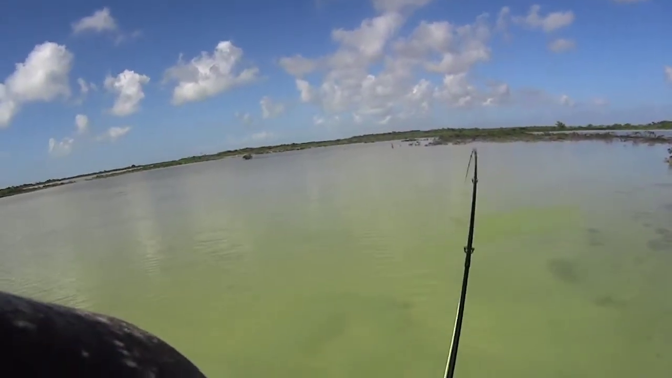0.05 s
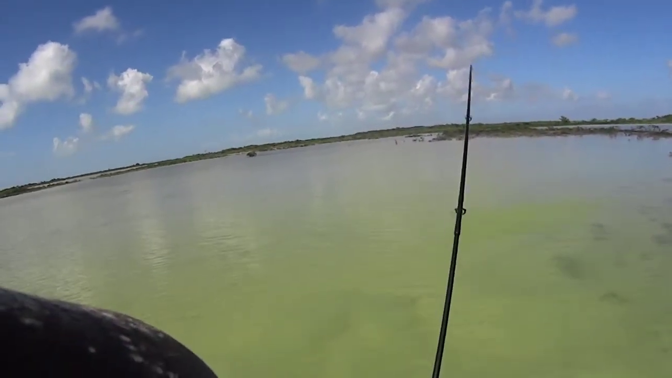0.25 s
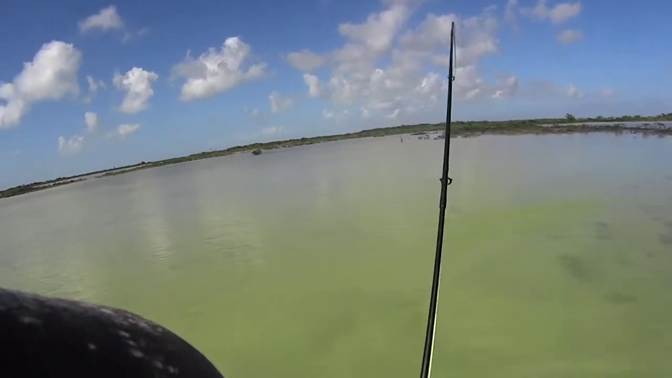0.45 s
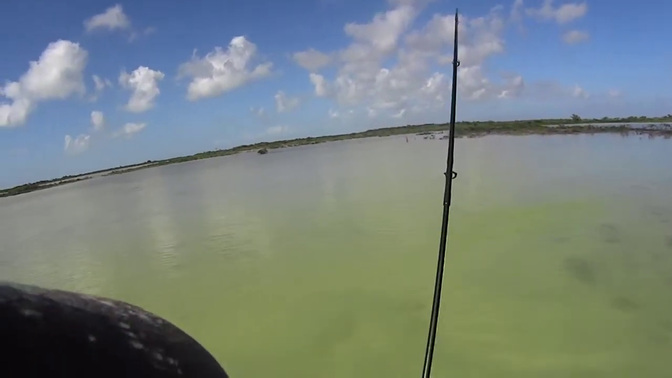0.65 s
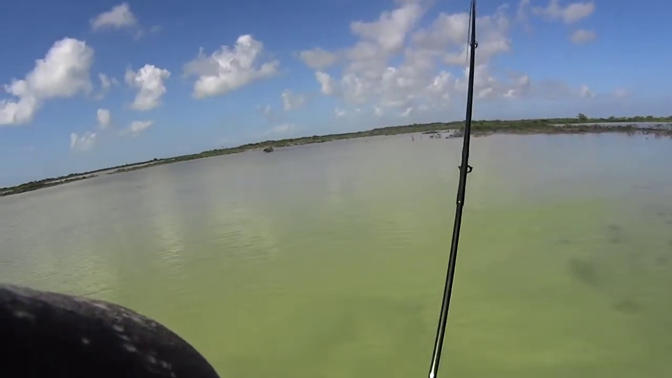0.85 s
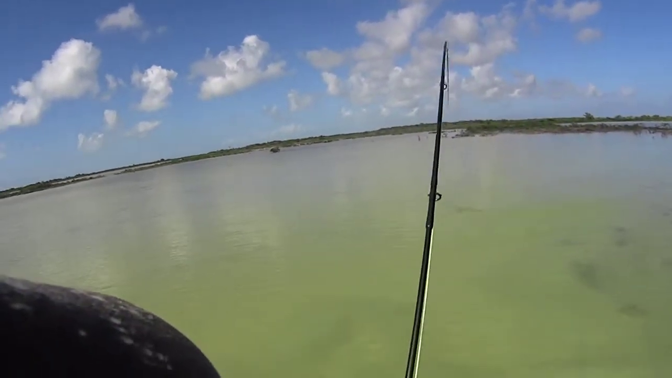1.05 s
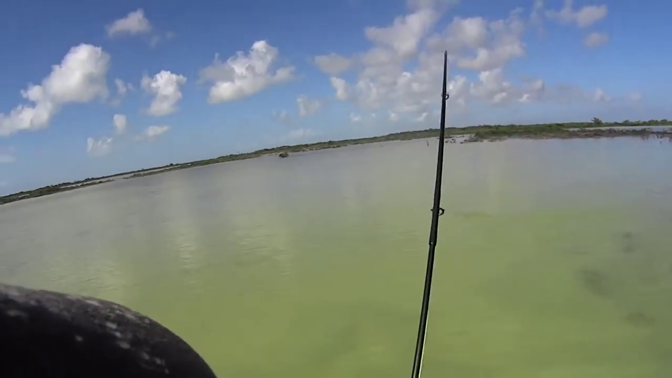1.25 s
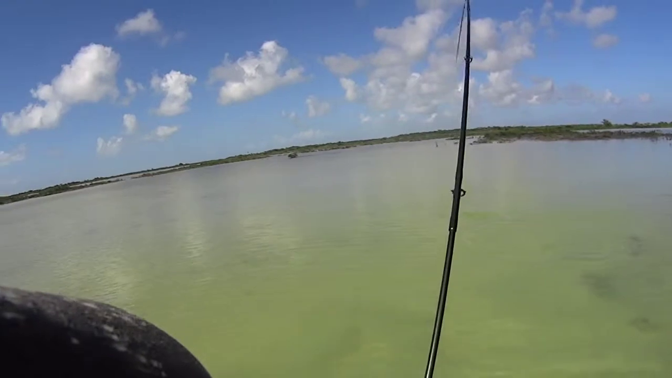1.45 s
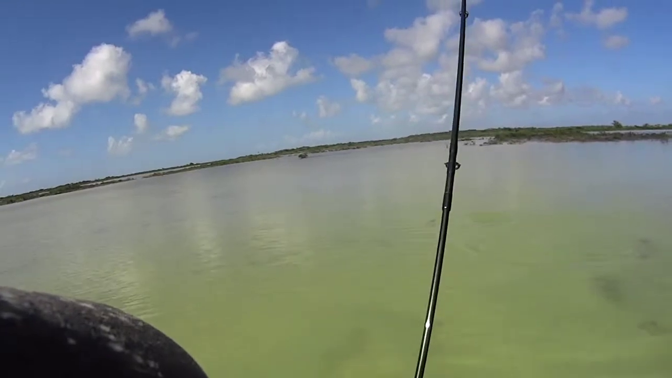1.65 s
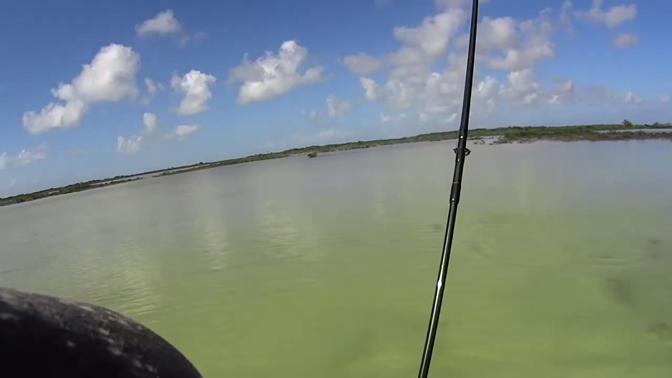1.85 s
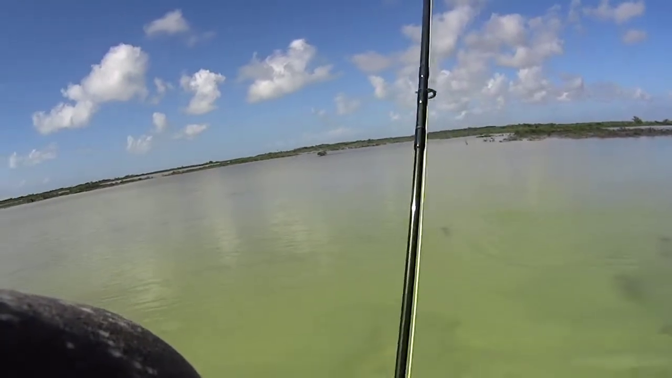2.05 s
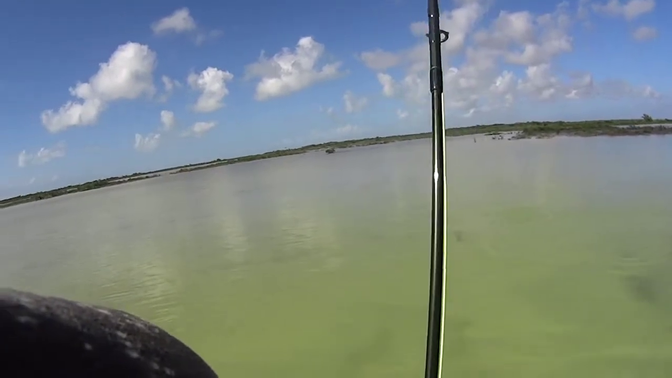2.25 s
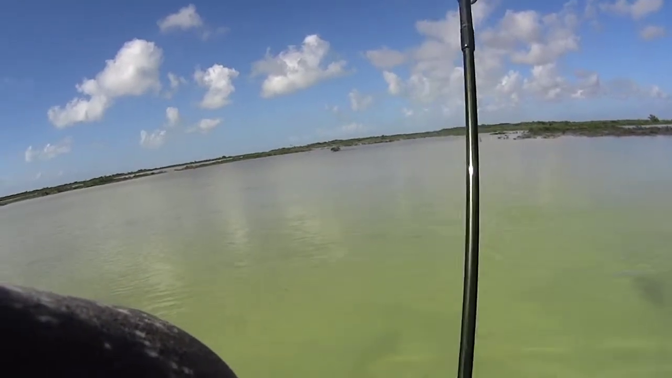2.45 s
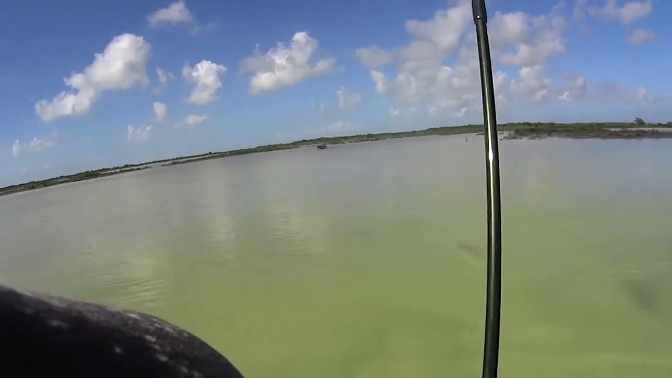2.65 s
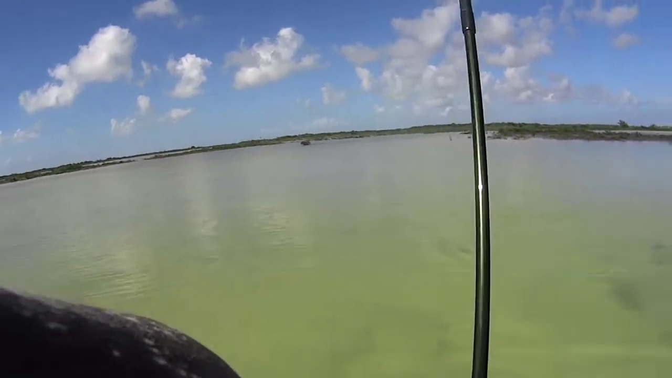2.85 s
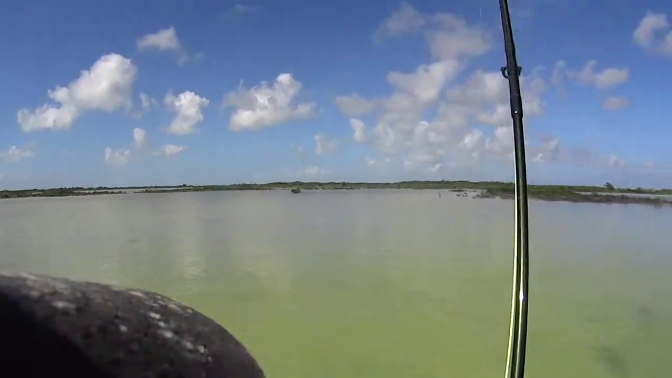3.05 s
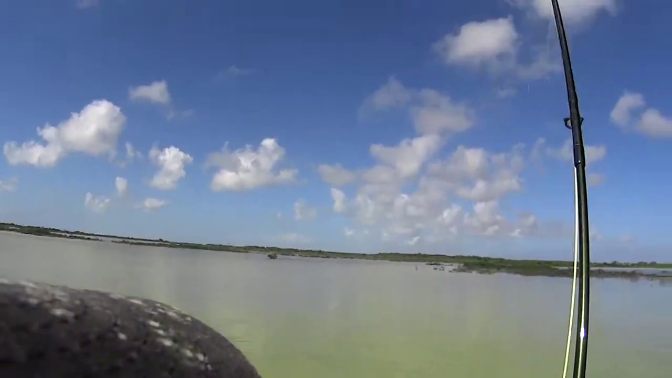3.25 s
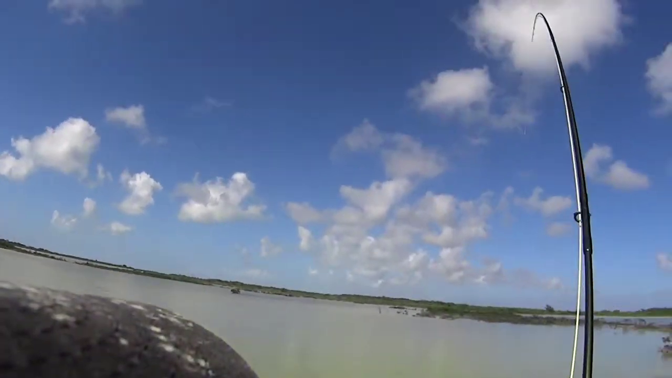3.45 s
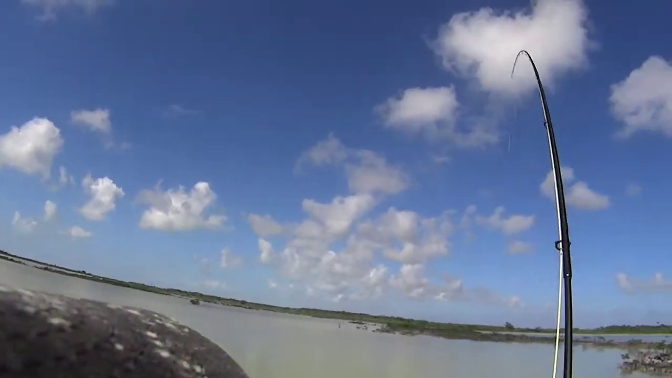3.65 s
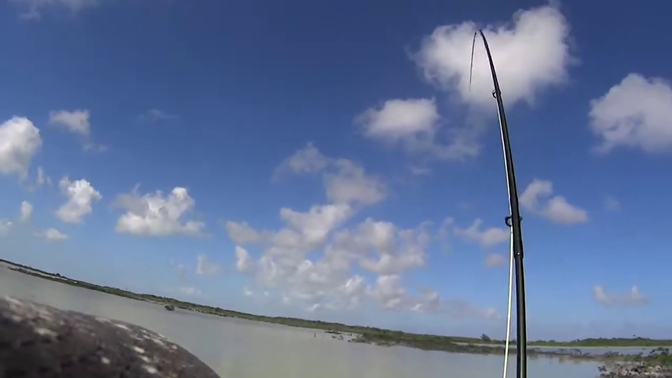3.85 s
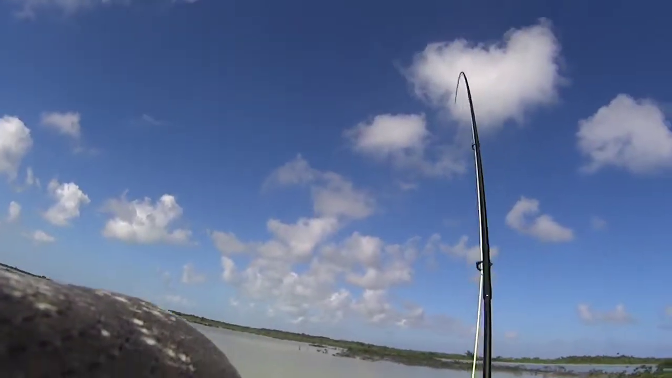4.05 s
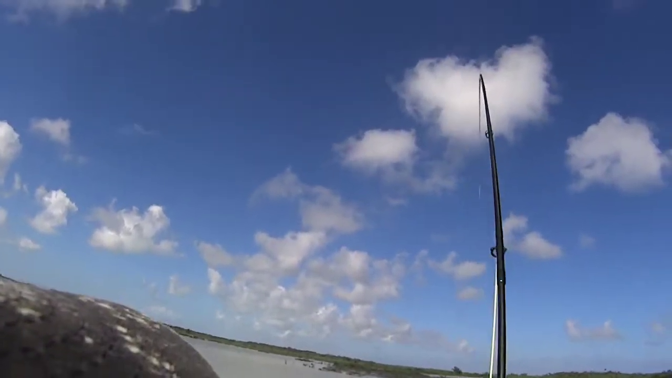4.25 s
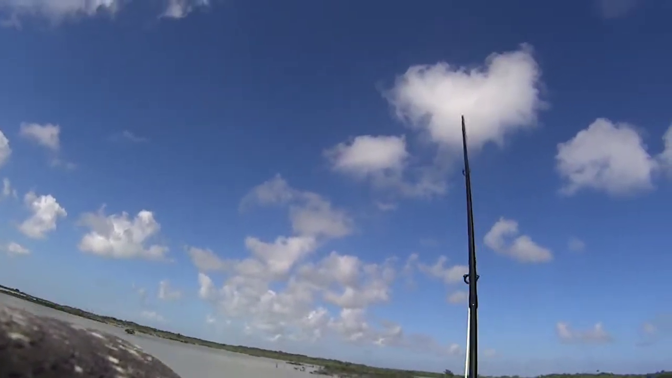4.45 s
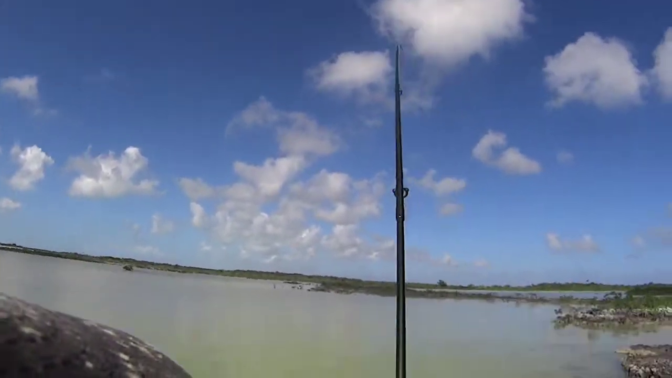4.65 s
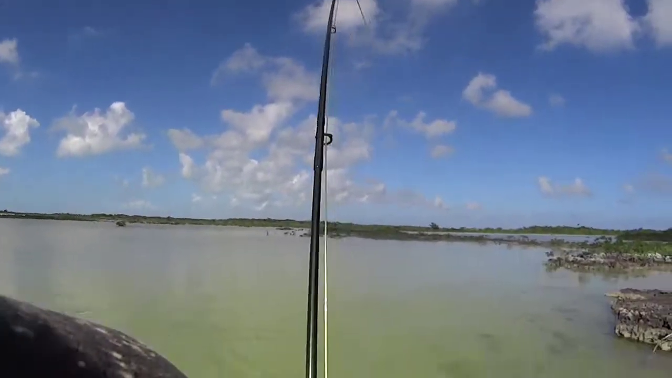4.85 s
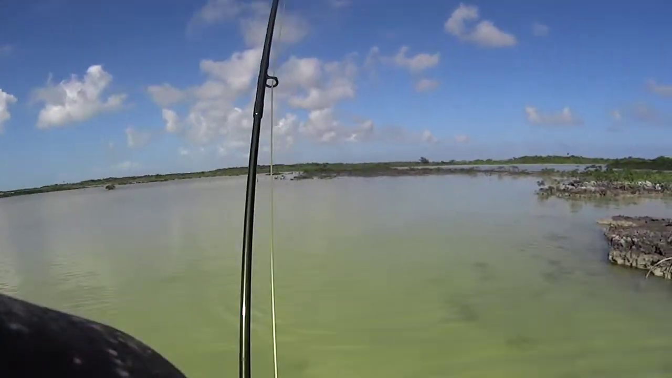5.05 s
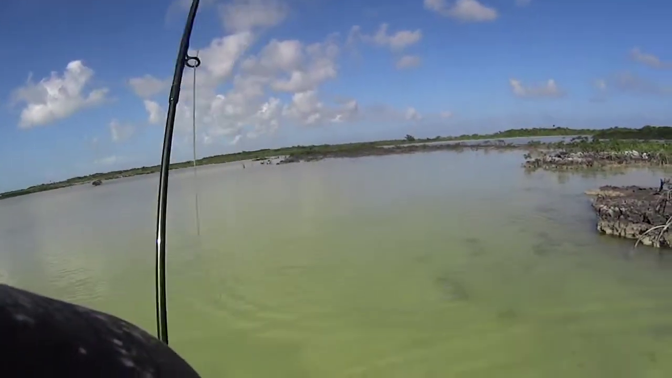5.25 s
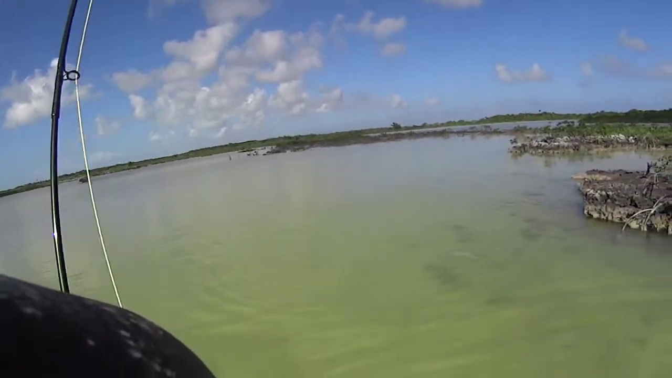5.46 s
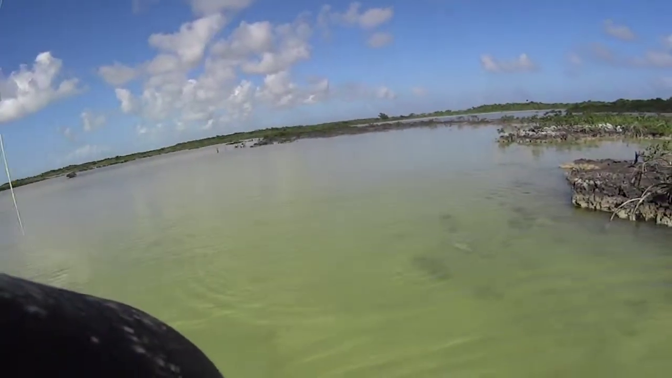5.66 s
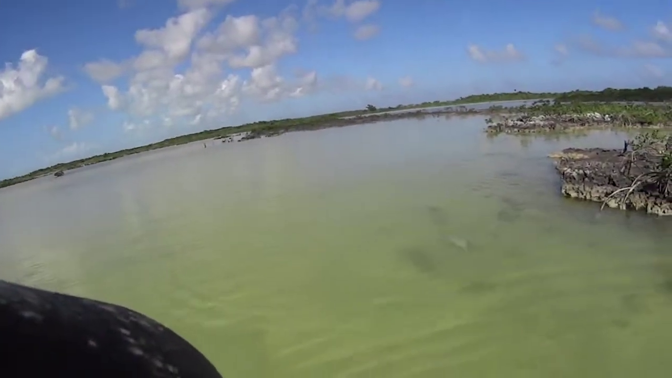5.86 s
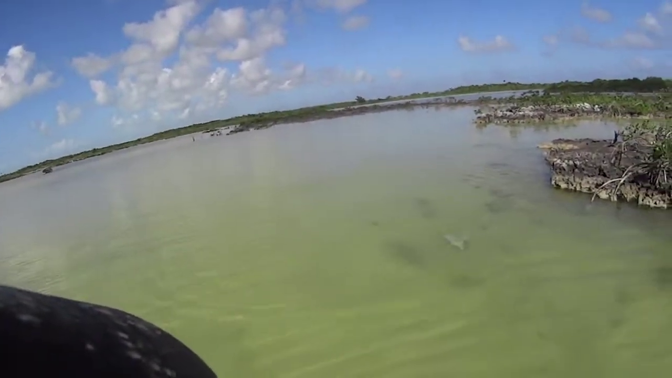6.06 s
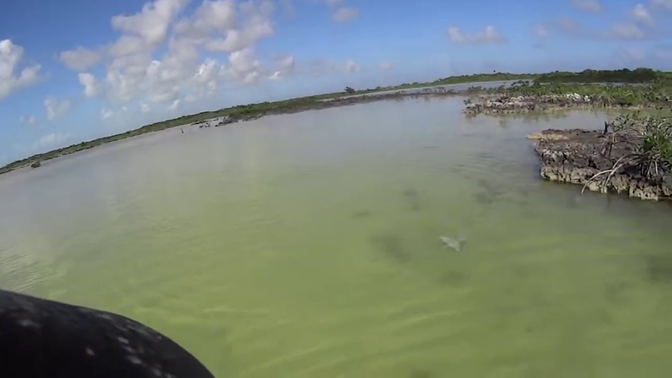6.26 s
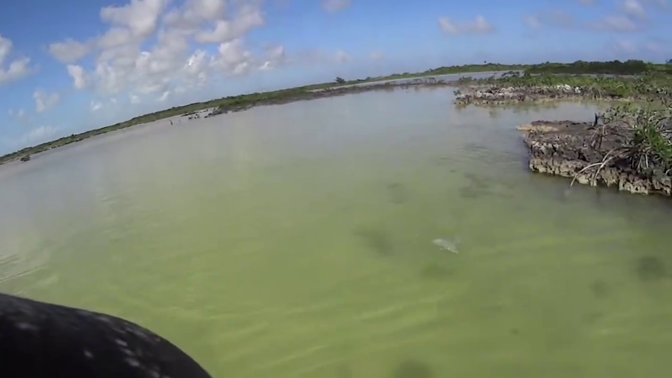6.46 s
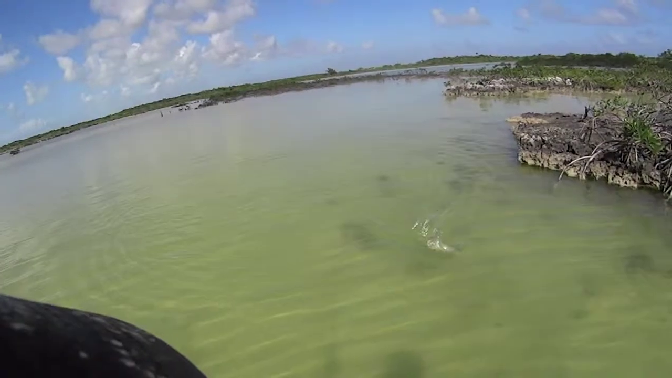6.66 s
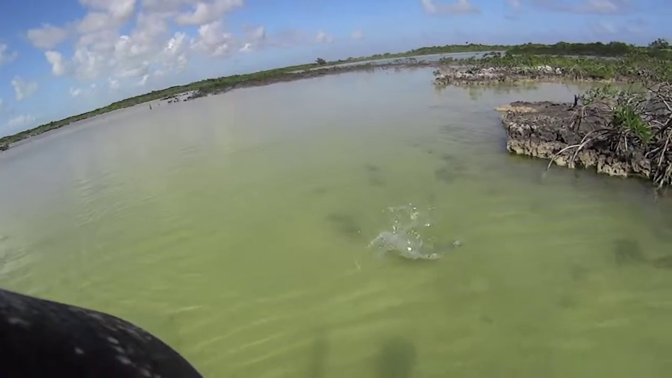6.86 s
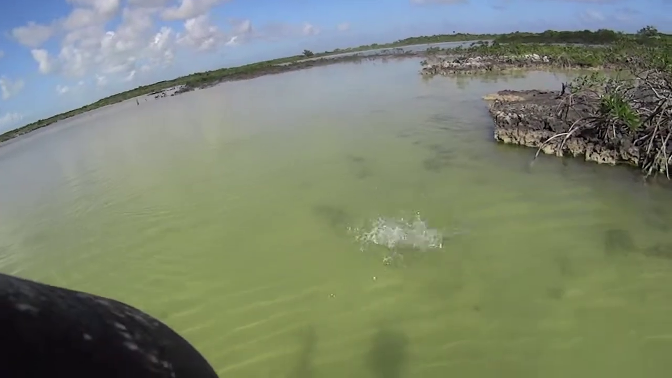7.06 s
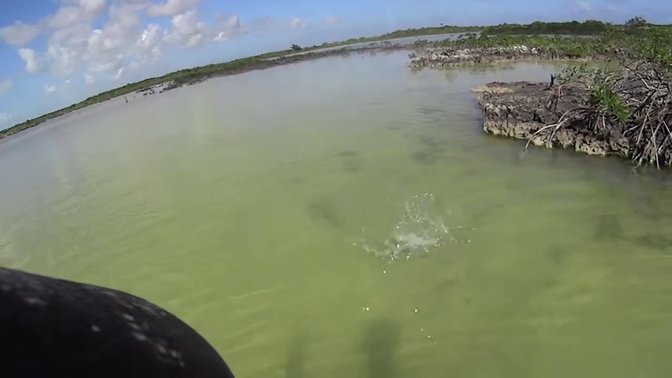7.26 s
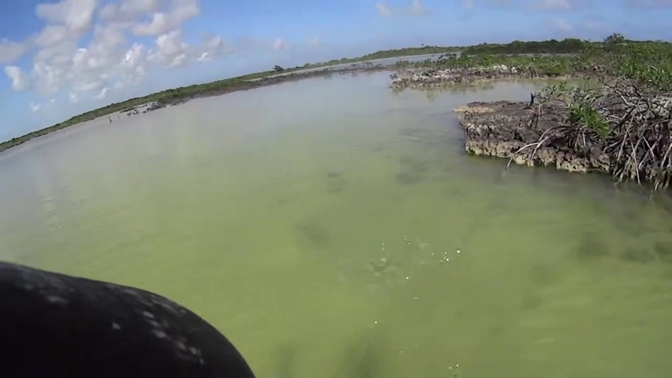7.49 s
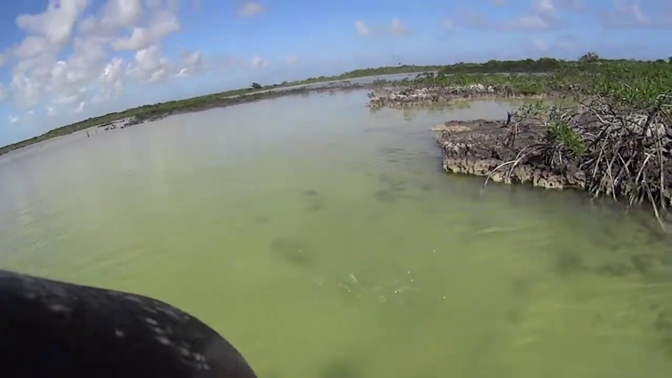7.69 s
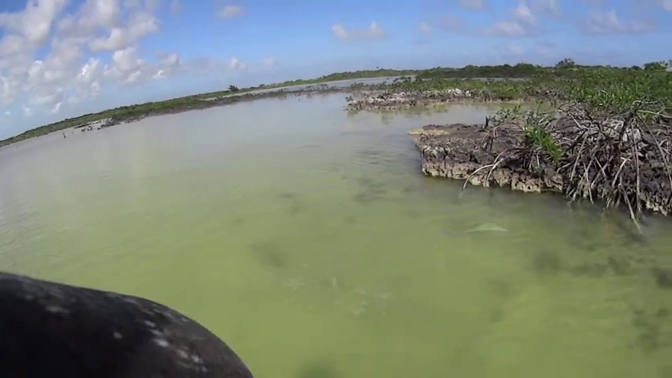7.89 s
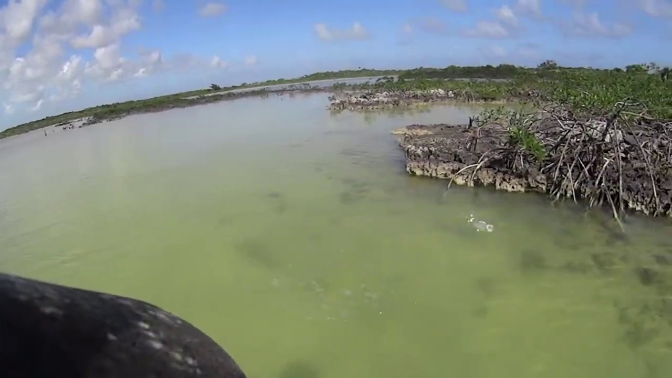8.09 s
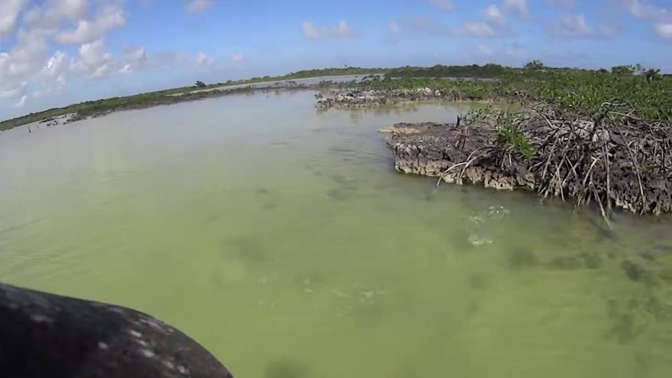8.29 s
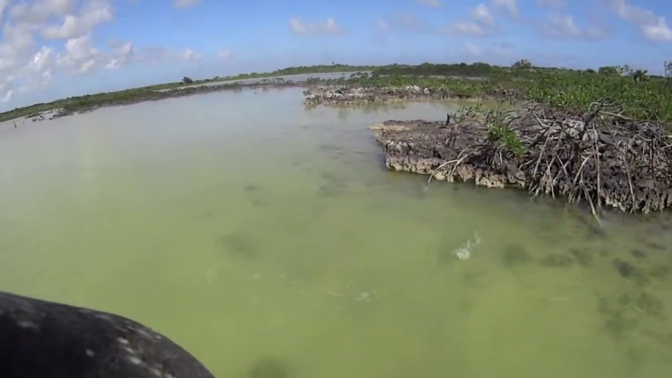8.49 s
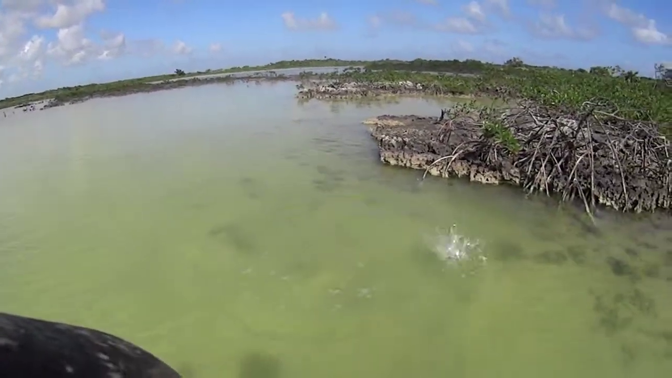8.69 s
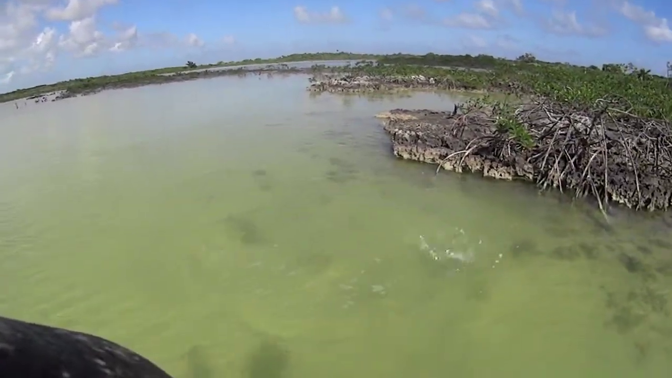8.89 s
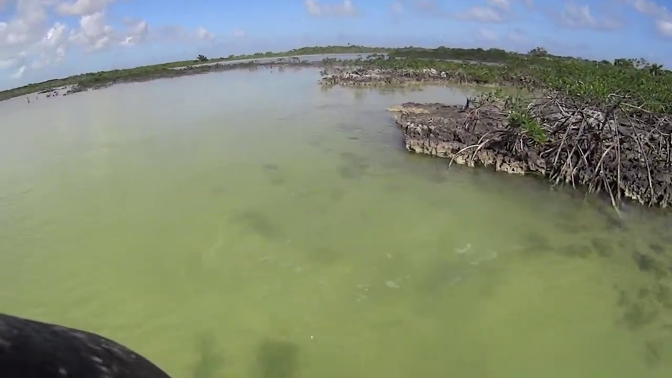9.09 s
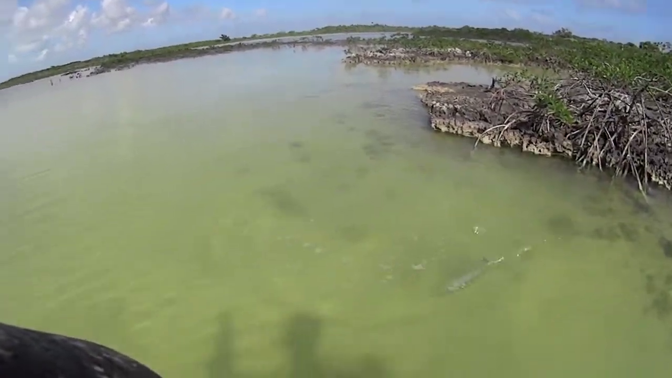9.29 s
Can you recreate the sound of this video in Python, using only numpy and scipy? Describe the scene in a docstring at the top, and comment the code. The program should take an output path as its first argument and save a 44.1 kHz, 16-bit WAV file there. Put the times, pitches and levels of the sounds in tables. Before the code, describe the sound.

Rapid metallic clicking from a fishing reel as line pulls off, followed by two bouts of fish splashing, over faint hiss.

```python
"""A fishing reel clicks in four runs as line is pulled off: its pawl, a small catch, snaps over the gear
teeth and makes the reel ring. The angler stands in calm shallow water. The rod and line tick, then a
hooked fish thrashes twice a few metres away, throwing spray and making bubbles ring. Underneath are
a thin far whistle, a breeze and the hiss of a camera microphone in its housing."""
import sys
import numpy as np
from scipy import signal
from scipy.fft import rfft, irfft
from scipy.io import wavfile

SR = 44100
rng = np.random.default_rng(int(sys.argv[2]) if len(sys.argv) > 2 else 0)


def dump_mix(stems):
    """Bounce the given channels to the path in sys.argv[1] as a 16-bit WAV at rate SR."""
    frames = np.atleast_2d(stems).T  # one column per channel
    limited = np.clip(frames, -1, 1)  # hard clip at full scale
    pcm = np.round(limited * 32767).astype(np.int16)
    wavfile.write(sys.argv[1], SR, pcm)


N = 411453
REEL_END, FISH_START = 5 * SR, round(6.6 * SR)   # samples


def amp(db):
    """Turn decibels into a gain."""
    return 10 ** (np.asarray(db) / 20)


def rms_one(x):
    """Scale to an average power of 1."""
    return x / np.sqrt(np.mean(x ** 2) + 1e-20)


def sides(mid, side):
    """Make left and right from what they share (mid) and what sets them apart (side)."""
    return np.array([mid + side, mid - side])


def in_time(rows, outside=None):
    """Join rows that start with t/s into one curve for each further column."""
    times, *columns = np.transpose(rows)
    return [np.interp(np.arange(N) / SR, times, column, outside, outside) for column in columns]


def at_hz(points, hz):
    """Read between rows of (f/Hz, value) on a log-frequency axis."""
    freqs, values = np.transpose(points)
    return np.interp(np.log(hz + 1), np.log(freqs), values)


def colour(x, hz, db, size=8192):
    """Give a sound these levels at these frequencies (a minimum-phase filter)."""
    gains = amp(at_hz(np.c_[hz, db], np.fft.rfftfreq(size, 1 / SR)))
    cepstrum = irfft(np.log(gains), size)
    cepstrum[1:size // 2] *= 2   # folded, so nothing rings ahead of the sound
    cepstrum[size // 2 + 1:] = 0
    kernel = irfft(np.exp(rfft(cepstrum)), size)[None, :size // 2]
    return signal.oaconvolve(np.atleast_2d(x), kernel, axes=1)[:, :x.shape[-1]]


def drift(rate_hz, size):
    """A smooth random wander of typical size 1."""
    r = np.exp(-64 * np.pi * rate_hz / SR)
    slow = signal.lfilter([1], [1, -2 * r, r * r], rng.standard_normal(size // 32 + 1002))[1000:]
    return np.interp(np.arange(size) / 32, np.arange(len(slow)), rms_one(slow))


def ring(clicks, hz, ring_s):
    """Each click starts a tone that fades by 60 dB in ring_s."""
    r, w = amp(-60 / (ring_s * SR)), 2 * np.pi * hz / SR
    return signal.lfilter([0, np.sin(w)], [1, -2 * r * np.cos(w), r * r], clicks + 1e-18)


def swells(times, db, fall_s, rise_s=0.0062):
    """A loudness curve from FISH_START on that rises to each event and falls away."""
    t = np.arange(FISH_START, N, 32) / SR - np.c_[times]
    peaks = amp(np.c_[db]) * np.exp(np.where(t < 0, t / rise_s, -t / fall_s))
    return np.repeat(peaks.sum(axis=0), 32)[:N - FISH_START]


def hiss(sound, quiet_db=-60.5, follows=0.1, memory_s=0.13):
    """Microphone noise that swells a little with the scene's loudness, then sinks back."""
    # tone of the hiss: f/Hz, relative level/dB
    spectrum = [(12, -48.5), (20, 9.5), (66, -13.5), (90, -11), (303, -11.5), (995, -16), (2030, -17.5),
                (2510, -19), (11000, -22.5), (14300, -49), (22000, -120)]
    # how alike left and right are: f/Hz, likeness (1 the same, -1 opposite)
    likeness = [(60, 0.96), (130, 0.46), (270, -0.19), (580, -0.65), (1220, -0.7), (2600, -0.37),
                (5510, 0.17), (11700, 0.59)]
    keep = np.exp(-1 / (memory_s * SR))
    power = signal.lfilter([1 - keep], [1, -keep], sound[0] ** 2) / amp(quiet_db) ** 2
    hiss_db = quiet_db + follows * 10 * np.log10(1 + power)
    hz = np.geomspace(10, 20000, 40)
    alike = np.clip(at_hz(likeness, hz), -.98, .98)
    mid_db = at_hz(spectrum, hz)
    side_db = mid_db + 10 * np.log10((1 - alike) / (1 + alike))
    mid = colour(rng.standard_normal(N), hz, mid_db)[0]
    side = colour(rng.standard_normal(N), hz, side_db)[0]
    return sides(mid, side) / np.std(mid) * amp(hiss_db)


def breeze():
    """Air rumbles on the microphone's openings."""
    # strength of the breeze: t/s, level/dB
    gusts = [(0.0, -64.5), (0.88, -76), (1.17, -64), (2.47, -74), (3.17, -63.5), (5.79, -73), (7.02, -72.5),
             (8.99, -67.5), (9.33, -75)]
    bass = signal.butter(2, [15, 70], "band", fs=SR, output="sos")
    return rms_one(signal.sosfilt(bass, rng.standard_normal(N))) * amp(in_time(gusts)[0])


def whistle(waver_db=5.8):
    """A thin far tone whose loudness wavers."""
    # course of the whistle: t/s, f/Hz, level/dB
    course = [(1.05, 3980, -84), (1.09, 3960, -69), (1.125, 3930, -86), (1.4, 4000, -80), (1.5, 3950, -77),
              (1.62, 3880, -85)]
    times, hz, db = np.transpose(course)
    t = np.arange(N) / SR
    level = np.sqrt(2) * amp(np.interp(t, times, db, -140, -140) + waver_db * drift(60, N))
    return level * np.sin(2 * np.pi * np.cumsum(np.interp(t, times, hz)) / SR)


def plops(events, cycles, crack_cycles, rise, crack_gain_db):
    """Each event is a bubble of rising pitch plus a noisy crack; small, high ones end sooner."""
    # tone of the crack: f/Hz, relative level/dB
    spectrum = [(600, -21.5), (1800, -11.5), (3000, 1), (4100, 2.5), (5200, 3.5), (6200, 0), (10000, -2.5)]
    size = 3000
    out, t = np.zeros((2, N + size)), np.arange(size) / SR
    white = rng.standard_normal((len(events), 2, size))
    noises = colour(white.reshape(-1, size), *np.transpose(spectrum)).reshape(white.shape)
    for (start_s, db, hz, crack_db), (mid, side) in zip(events, noises):
        tone = np.sin(2 * np.pi * hz * t * (1 + rise * hz * t))
        bubble = tone * amp(-60 * t * hz / cycles) * (1 - np.exp(-t / 0.00042))
        burst = np.exp(-t * hz / crack_cycles) * (1 - np.exp(-t * hz / 1.6))
        crack = sides(mid, 0.27 * side) * burst * amp(crack_db + crack_gain_db)
        start = round(start_s * SR)
        out[:, start:start + size] += amp(db) * (bubble + crack)
    return out[:, :N]


def ticks():
    """Rod and line tick and water drips near the angler, each a short ping with a crack."""
    # ticks and drips: t/s, level/dB, f/Hz, relative crack level/dB
    events = [(1.712, -39.5, 5470, -9.5), (2.0443, -53.5, 2360, 0), (2.1137, -38.5, 2070, -9.5),
              (3.987, -39.5, 5300, -5.5), (5.3996, -30, 4260, -18), (5.4146, -41.5, 1770, -16),
              (5.5019, -39.5, 2180, -14.5), (6.1045, -39, 2360, -16), (6.1305, -45, 1590, -7.5),
              (6.1644, -46.5, 2130, -9), (6.2444, -35, 5270, -20), (6.3894, -38, 3000, -10),
              (6.4813, -31, 4370, -28), (6.6444, -43, 1960, -15), (6.667, -39, 5400, -8),
              (6.6758, -47.5, 1800, 3.5)]
    return plops(events, cycles=16.6, crack_cycles=5.8, rise=0.0026, crack_gain_db=9.9)


def droplets(size, per_s, low_hz, high_hz, cycles, spread_db):
    """Random drops of uneven size ring briefly at 14 pitches, a little to the left or right."""
    strengths = amp(spread_db * np.minimum(rng.exponential(1, size), 4)) * rng.choice([-1, 1], size)
    lands = rng.random(size) < per_s * amp(3 * drift(25, size)) / SR
    pitch_index, out = rng.integers(0, 14, size), 0
    for k, hz in enumerate(np.geomspace(low_hz, high_hz, 14)):
        drops = ring(strengths * lands * (pitch_index == k), hz, cycles / hz) * np.sqrt(hz)
        out = out + sides(drops, 0.32 * (-1) ** k * drops)
    return rms_one(out)


def fish(sheet_db=-2.5, surge_db=1.52):
    """Torn sheets of water hiss, drops crackle above, bubbles churn below and the body heaves water."""
    # the two struggles: t/s, spray level/dB, relative churn level/dB
    struggles = [
        [(6.69, -76, 0), (6.74, -73, 10), (6.8, -50, 10.5), (6.87, -50.5, 2), (6.94, -39.5, 3), (7.04, -43, -2),
         (7.18, -40, 6), (7.23, -44.5, 6), (7.39, -38.5, -3.5), (7.56, -48, 1.5), (7.71, -60.5, -8),
         (7.9, -68, -4)],
        [(8.05, -59.5, 0), (8.2, -61, 6), (8.3, -55, 8), (8.46, -54, 5), (8.55, -52.5, 4), (8.68, -39.5, 4),
         (8.72, -50, -3), (8.9, -44.5, -1.5), (9.04, -47.5, -2), (9.1, -57.5, -4), (9.33, -63.5, -21)],
    ]
    # slaps on the water: t/s, level/dB, bubble f/Hz, relative crack level/dB
    slaps = [(6.7039, -22, 1665, -15.5), (6.7376, -29, 2700, -32), (6.7587, -36.5, 1690, -22),
             (6.785, -34.5, 1850, -5.5), (6.829, -31.5, 2110, -18), (6.8869, -39, 1890, -26),
             (6.9106, -33, 2160, -16), (6.9898, -24, 1900, -5), (7.043, -28, 4850, -17),
             (7.063, -26, 2470, -14), (7.1498, -15.5, 2200, -19), (7.214, -26, 1890, -19),
             (7.2497, -24.5, 1790, -13), (7.279, -23.5, 1725, -16), (7.3972, -33.5, 2980, 4),
             (7.417, -22, 5200, -0.5), (7.5233, -32.5, 1700, -5), (7.637, -39.5, 2040, -4),
             (7.698, -44, 5100, 2), (7.7457, -37.5, 1910, -12), (8.118, -39, 2500, -13),
             (8.139, -34, 4800, -18), (8.176, -26.5, 1840, -37), (8.222, -36.5, 1810, -10),
             (8.2606, -27.5, 1940, -21), (8.2895, -29, 1980, -27), (8.369, -33.5, 1760, -38),
             (8.4039, -38, 3010, -17), (8.432, -34, 1290, -11.5), (8.5286, -28.5, 4870, -23),
             (8.5514, -29.5, 1850, -28), (8.5836, -27, 1910, -3.5), (8.646, -42, 1880, -14),
             (8.671, -35, 2100, 0), (8.725, -28, 2920, -15), (8.7597, -34, 5360, -2),
             (8.7801, -29.5, 3320, -6.5), (8.836, -39.5, 1560, -0.5), (8.8587, -42, 5040, -12),
             (8.932, -30, 3120, -14), (8.9478, -28.5, 1930, -11), (8.9834, -28.5, 3320, -7),
             (9.032, -54, 5460, 1), (9.0552, -31, 3430, 4.5), (9.23, -29.5, 3560, -1),
             (9.2856, -50, 1850, 2), (9.3031, -28.5, 5350, -9)]
    # lunges of the body: t/s, gulp level/dB, gulp f/Hz, heave level/dB
    lunges = [(6.704, -37.5, 950, -66), (6.782, -52, 410, -50.5), (6.91, -50, 384, -80),
              (6.983, -46, 700, -73), (7.066, -46, 745, -62), (7.167, -35.5, 740, -46.5),
              (8.589, -51, 670, -55), (8.669, -60, 520, -51.5), (8.8, -52, 700, -60)]
    # tone of the water through the housing: f/Hz, relative level/dB
    spectrum = [(530, -32), (900, -22), (1060, -26), (1220, -7), (1350, -15.5), (1580, -3.5), (1890, 1),
                (2670, -9), (3070, -4.5), (4150, -11), (5120, -2), (5990, -9.5), (8560, -9), (9300, -6),
                (11000, -13), (14300, -37), (22000, -120)]
    spraying, churning, size = 0, 0, N - FISH_START
    for rows in struggles:
        spray_db, churn_db = in_time(rows, outside=-np.inf)   # silent before and after
        spraying += amp(spray_db)[FISH_START:]
        churning += amp(spray_db + churn_db)[FISH_START:]
    slap_s, slap_db, _, _ = np.transpose(slaps)
    lunge_s, _, _, heave_db = np.transpose(lunges)
    gush = swells(slap_s, slap_db - 24.5, fall_s=0.02)   # each slap throws extra spray and churn
    white = rng.standard_normal((2, size))
    sheet = amp(sheet_db) * sides(white[0], 0.1 * white[1])
    drops = droplets(size, per_s=1500, low_hz=2500, high_hz=10400, cycles=10.6, spread_db=3.54)
    bubbles = droplets(size, per_s=600, low_hz=968, high_hz=3104, cycles=55.0, spread_db=3.1)
    high = signal.butter(2, 2500, "high", fs=SR, output="sos")
    low = signal.butter(2, 2500, "low", fs=SR, output="sos")
    spray = rms_one(signal.sosfilt(high, colour(sheet + drops, *np.transpose(spectrum))))
    churn = rms_one(signal.sosfilt(low, colour(sheet + bubbles, *np.transpose(spectrum))))
    spray *= spraying + amp(-2.0) * gush
    churn *= amp(-5.5) * churning + amp(-3.0) * gush
    heave = droplets(size, per_s=600, low_hz=475, high_hz=1070, cycles=11.3, spread_db=1.3)
    heave *= amp(-23.5) * churning + swells(lunge_s, heave_db, fall_s=0.017)
    water = (spray + churn) * amp(surge_db * drift(25, size)) + heave
    gulp_events = [(*row[:3], -40) for row in lunges]   # gulps have almost no crack
    gulps = plops(gulp_events, cycles=33.0, crack_cycles=3.0, rise=0.0053, crack_gain_db=0.5)
    smacks = plops(slaps, cycles=38.0, crack_cycles=8.9, rise=0.004, crack_gain_db=5.9)
    return np.pad(water, ((0, 0), (FISH_START, 0))) + smacks + gulps


def pawl(gear_teeth=36, jitter=0.016, contact_s=0.0021, chatter=0.33, rasp_db=-22,
         bounce_s=0.00145, wobble_s=0.00005):
    """The pawl snaps over each tooth, chatters and bounces twice. Gives its blows and the teeth per s."""
    # spool speed in each run, surging about six times a second as the rod nods: t/s, speed/(teeth per s)
    speeds = [
        [(0.0578, 69.2), (0.113, 369.1), (0.22, 534.9), (0.345, 366.4), (0.366, 332.5), (0.387, 247.7),
         (0.4441, 76.6)],
        [(1.2183, 40.8), (1.2658, 87.2), (1.3173, 64.1), (1.3908, 51.4)],
        [(2.6244, 87.5), (2.6725, 121.0), (2.6986, 97.7), (2.8137, 121.7), (2.8618, 77.0), (2.9439, 149.2),
         (3.049, 70.4), (3.1171, 177.2), (3.1682, 88.3), (3.2223, 56.5), (3.2764, 132.4), (3.3515, 90.9),
         (3.4426, 127.1), (3.4907, 91.6), (3.5838, 137.9), (3.6349, 66.2), (3.689, 113.8), (3.7421, 115.7),
         (3.7992, 40.1)],
        [(4.1307, 54.1), (4.1554, 106.4), (4.213, 88.8), (4.3507, 93.6), (4.4163, 161.8), (4.469, 108.7),
         (4.5516, 90.0), (4.5743, 98.3), (4.6709, 76.1), (4.7146, 110.5), (4.7702, 60.2)],
    ]
    # how hard the pawl is pressed in each run: t/s, level/dB
    pulls = [
        [(0.0, -50), (0.058, -44), (0.12, -38.5), (0.33, -38.5), (0.45, -44.5)],
        [(1.165, -65), (1.218, -51), (1.29, -49.5), (1.34, -44.5), (1.39, -44.5)],
        [(2.625, -52.5), (2.66, -47), (3.2, -47.5), (3.6, -46), (3.75, -49), (3.8, -51)],
        [(4.131, -51.5), (4.17, -47), (4.5, -45.5), (4.77, -46.5)],
    ]
    # how the reel faces the microphone in each run: gain/dB for each of its six groups of tones
    facings = [(-8.5, -3.5, -1.3, 0, -10.5, -5.5), (-16, -5, 0.57, -3, -17, -16),
               (-2, 1, -0.53, -2.5, -12.5, -17), (0.5, -1, -1.6, -2.5, -13.5, -19)]
    # each group's sound beams sweep past as the spool turns: {beams per turn: (depth/dB, phase/rad)}
    beams = [{1: (3.54, 0.13), 3: (1.2, 1.84)}, {1: (3.4, -1.8), 5: (2.1, 1.2)}, {1: (2, 1.3),
             3: (3.3, -0.48)}, {1: (2.3, 0.95), 4: (0.94, -0.082),
             5: (1.9, -2.8)}, {1: (2.1, -2.2)}, {1: (3, -0.97), 2: (1.6, 0.34)}]
    # single snaps: t/s, relative level/dB
    lone_snaps = [(0.0225, -28.5), (0.4626, -34), (1.1653, -36.5)]
    snaps, drag, pace, passed = np.zeros((6, N)), np.zeros((6, N)), np.zeros(N), np.zeros(N)
    for speed, pull, facing in zip(speeds, pulls, facings):
        per_s, = in_time(speed, 0)
        teeth = np.cumsum(per_s) / SR
        load = amp(in_time(pull)) * amp(np.c_[list(facing)])
        run = slice(round(pull[0][0] * SR), round(speed[-1][0] * SR))
        drag[:, run] += load[:, run]
        pace += per_s
        lag = jitter * rng.standard_normal(round(teeth[-1]) + 2) ** 2   # no two teeth alike
        reached = np.ceil(teeth - np.minimum(lag[teeth.astype(int)], .9))
        passing = np.diff(np.maximum.accumulate(reached), prepend=0) > 0
        passed += np.cumsum(passing)
        snaps += passing * load * np.sqrt(400 / (per_s + 1))   # faster snaps share the same power
    angle = 2 * np.pi * passed / gear_teeth
    snaps *= amp([sum(db * np.sin(n * angle + phase) for n, (db, phase) in group.items())
                  for group in beams])
    for start_s, db in lone_snaps:
        snaps[:, round(start_s * SR)] = amp(db - 10 + np.array([-4, 5, -1, 0, -2.5, -1]))   # per group
    snaps = snaps[:, :REEL_END]
    fade = np.exp(-1 / (contact_s * SR))
    contact = signal.lfilter([0, np.sqrt(1 - fade ** 2)], [1, -fade], snaps + 1e-18)
    # between snaps the pawl scrapes up the next tooth, most when the spool creeps
    rasp = amp(rasp_db) * (drag * np.exp(-pace / 45))[:, :REEL_END]
    blows = snaps + (chatter * contact + rasp) * rng.standard_normal(REEL_END)
    # the gear runs off centre, so the bounce time and the tone slide on every turn
    hits = np.flatnonzero(snaps[0])
    flight_s = bounce_s + wobble_s * (np.sin(angle[hits] - 1.75) + 0.52 * np.sin(2 * angle[hits] + 2.3))
    bounce = 0.55 * np.clip(pace[hits] / 95, .4, 1)   # a slow pawl hardly bounces
    for k in (1, 2):
        blows[:, hits + np.round(k * flight_s * SR).astype(int)] += bounce ** k * snaps[:, hits]
    return blows, pace[:REEL_END]


def reel(sway_db=3.0, sway_hz=7.7, side_db=-12):
    """The pawl's blows make the reel ring, and the spindle whirrs softly while it turns."""
    # the reel's tones in six groups (low, lower middle, middle, high, treble, frame):
    # f/Hz, relative level/dB, ring time/s
    tone_groups = [
        [(4214, -2, 0.014), (3750, -0.5, 0.0075), (4304, 0, 0.019)],
        [(4870, 0.5, 0.0089)],
        [(5350, 3.5, 0.016), (5606, -4, 0.013)],
        [(6640, 6, 0.014), (6910, -5.5, 0.014), (6120, -15, 0.0084)],
        [(7860, 6.5, 0.0038), (9214, 6, 0.0074), (11140, 6, 0.0016)],
        [(2745, -5.5, 0.013), (3320, -1, 0.012)],
    ]
    blows, pace = pawl()
    mid, side, sign = 0, 0, -1
    for struck, tones in zip(blows, tone_groups):
        for hz, db, ring_s in tones:
            sign = -sign
            tone = sign * ring(struck * amp(db + sway_db * drift(sway_hz, REEL_END)), hz, ring_s)
            lean = np.clip(drift(3.7, REEL_END), -2, 2) - .15   # each tone wanders left and right
            mid = mid + tone
            side = side + tone * lean
    whirr = ring((pace / 100) ** 0.98 * rng.standard_normal(REEL_END), hz=1943, ring_s=0.011)
    stereo = sides(mid + amp(-79) * whirr, amp(side_db) * side)
    no_bass = signal.butter(4, 1500, "high", fs=SR, output="sos")   # a small reel gives off no bass
    return np.pad(signal.sosfilt(no_bass, stereo), ((0, 0), (0, N - REEL_END)))


def scene():
    """Reel, ticks, fish and whistle over hiss and breeze."""
    sound = reel() + ticks() + fish() + whistle()
    return sound + hiss(sound) + breeze()


def record(dry):
    """Cut the treble steeply above 11000 Hz."""
    return signal.sosfilt(signal.ellip(10, .5, 60, 11000, fs=SR, output="sos"), dry)


dry = scene()
out = record(dry)
dump_mix(out)
```